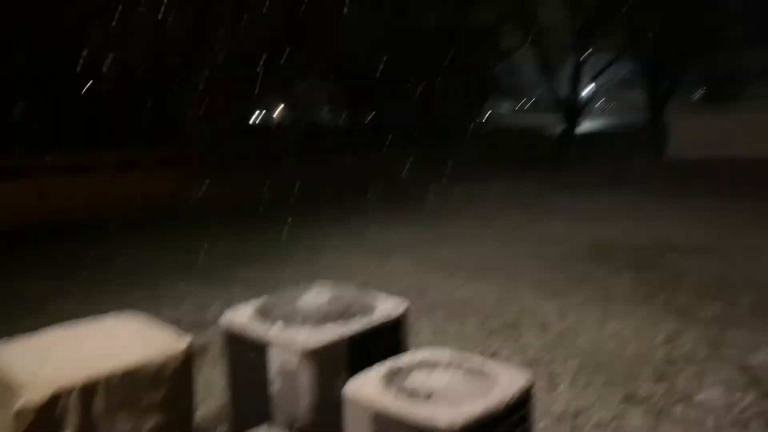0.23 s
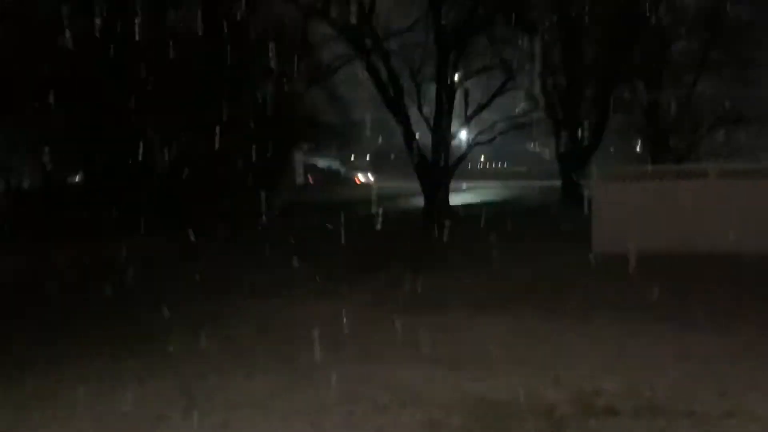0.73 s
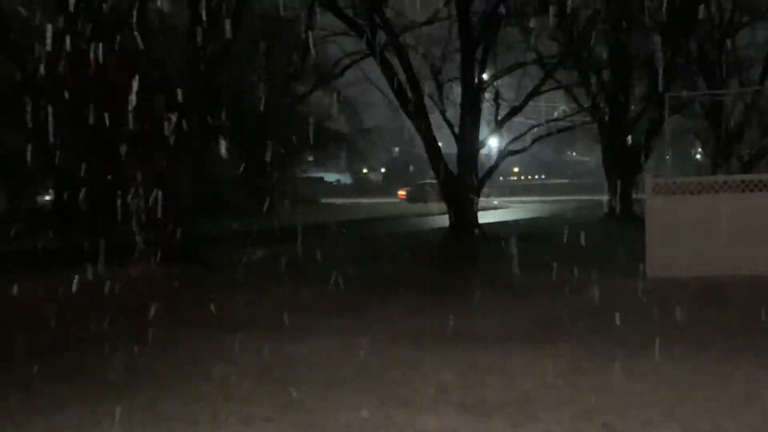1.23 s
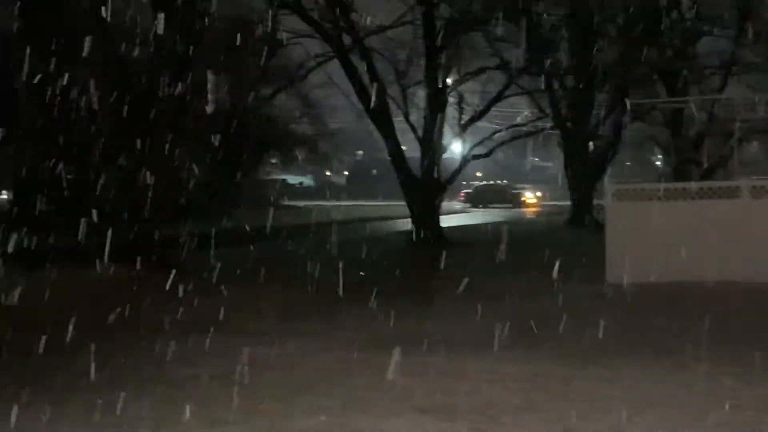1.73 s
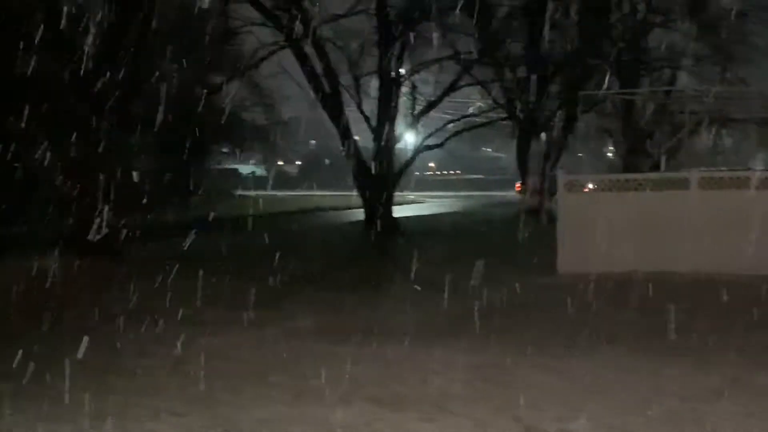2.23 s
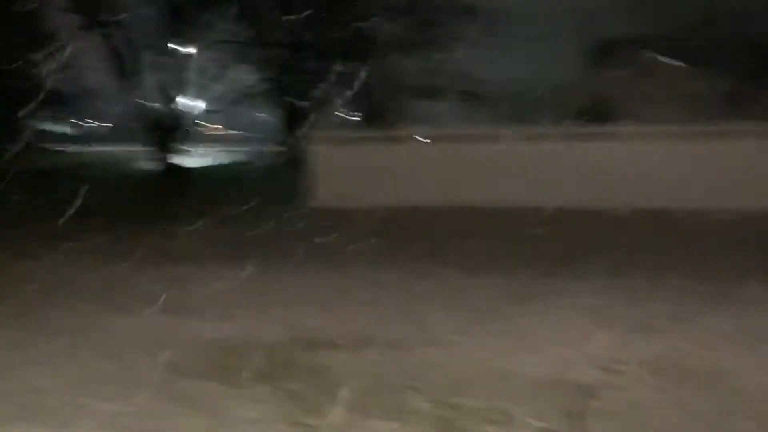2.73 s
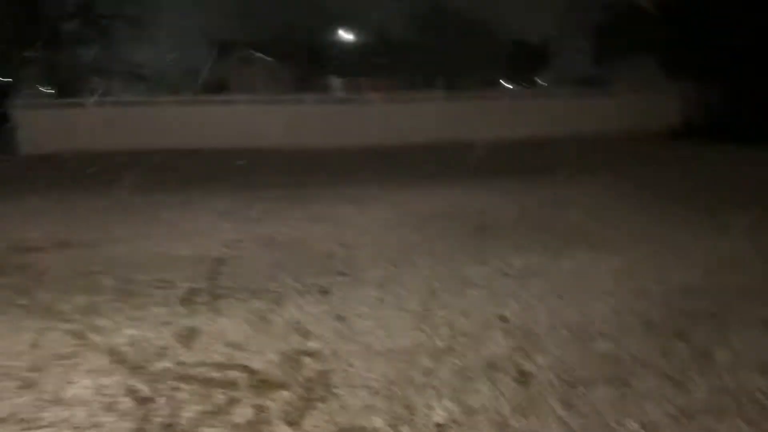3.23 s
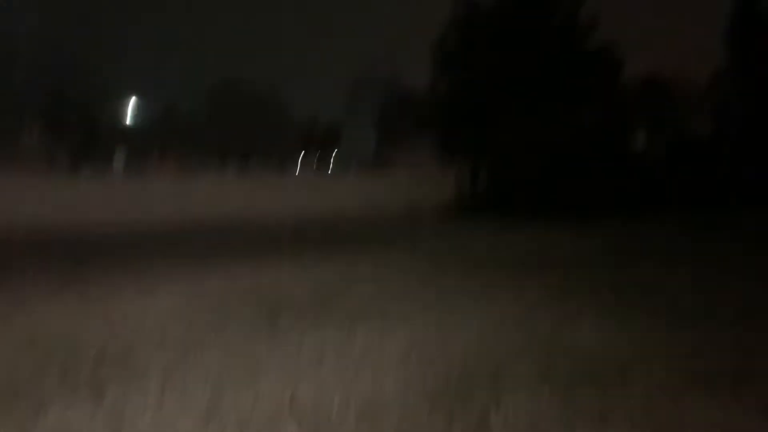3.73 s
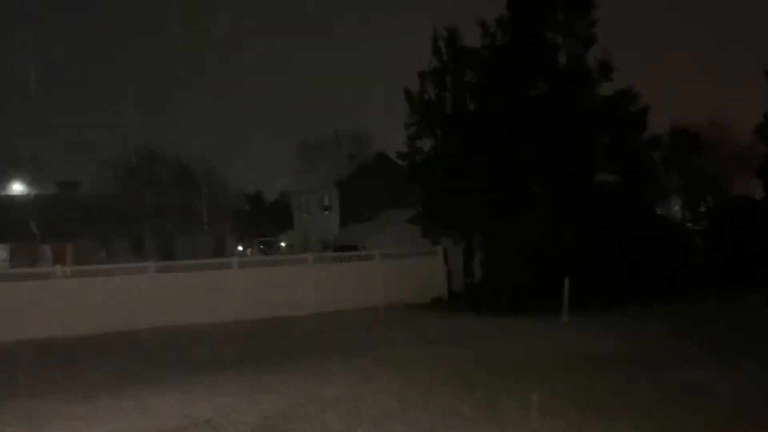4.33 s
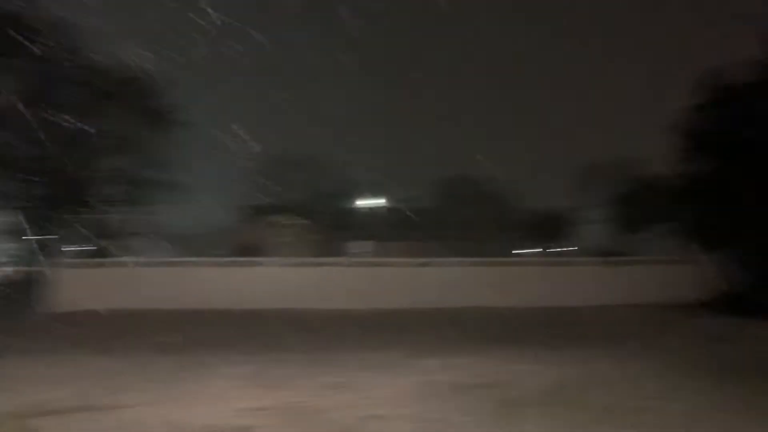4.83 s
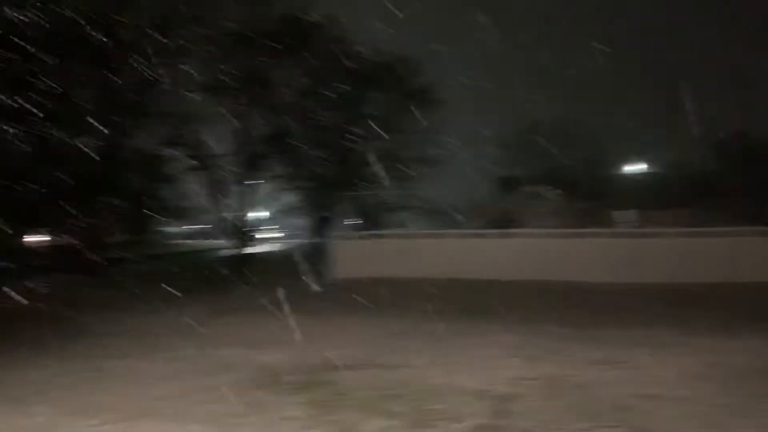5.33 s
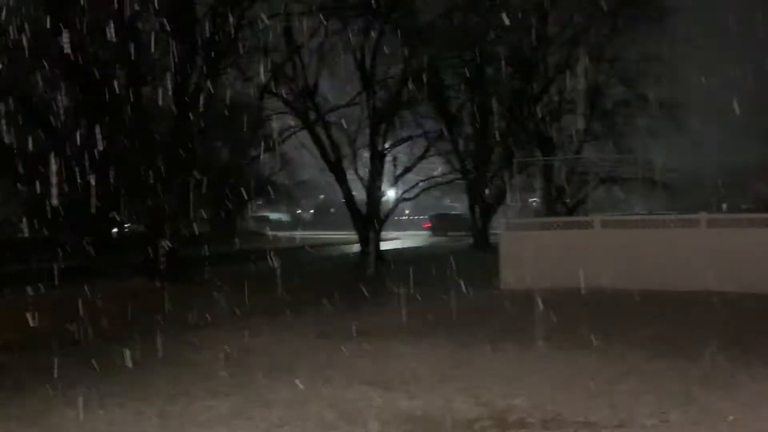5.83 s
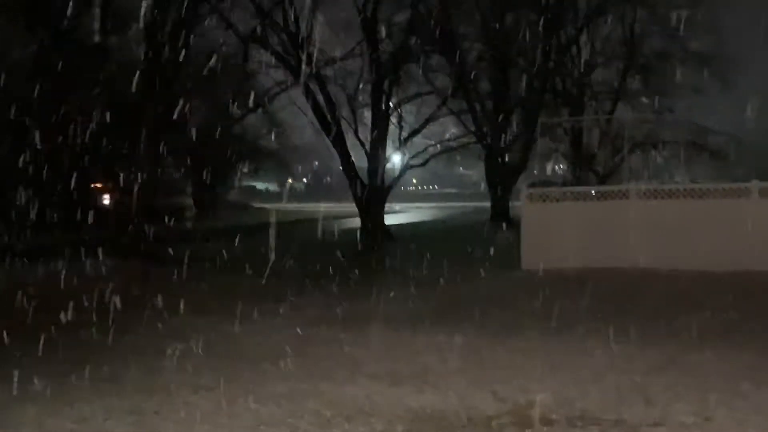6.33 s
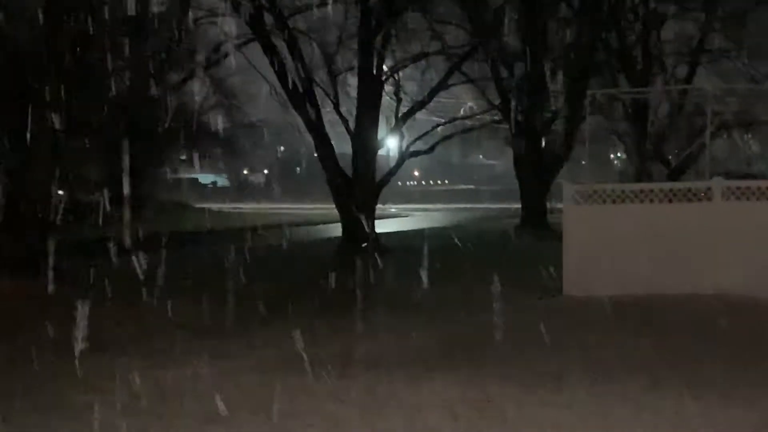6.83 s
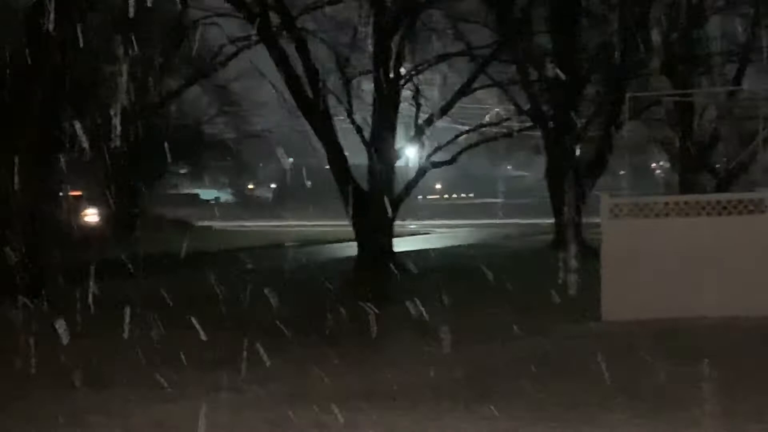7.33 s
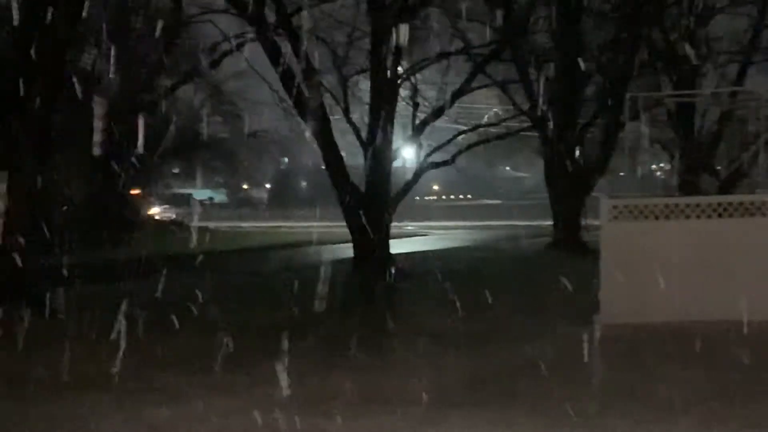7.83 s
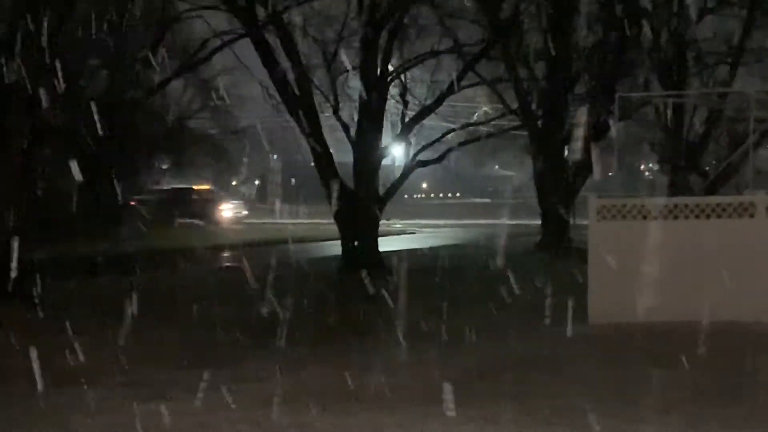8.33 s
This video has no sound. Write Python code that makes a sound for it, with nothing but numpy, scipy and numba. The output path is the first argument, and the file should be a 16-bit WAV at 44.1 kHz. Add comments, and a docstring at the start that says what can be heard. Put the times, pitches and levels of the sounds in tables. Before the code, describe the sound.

Outdoors at night, a quiet low rumble with faint road roar and hiss. A close coat sleeve swishes early, then a truck pulls away on the wet street beyond the lawn, tyres spraying softly. Its uneven engine note climbs, drops at a gear shift and climbs again. Sleet ticks on sheet metal; two dull knocks hit the hand-held phone midway, followed by the strongest cloth swish. More soft rustles come near the end.

```python
"""Wet street beyond a lawn on a sleety night, heard with a hand-held phone: an uneven eight-cylinder truck
pulls away and shifts gear. Its engine is a sum of orders of the engine cycle, its tyre spray is noise in tread
resonances. Town rumble, road roar and hiss are bands of noise; a far hum is one drifting tone. Close by, a coat
sleeve swishes and its seam snaps (filtered noise), sleet ticks on sheet metal (short noise bursts), and the hand
taps and knocks the phone (a soft pulse and short sagging tones)."""
import sys
import numpy as np
from scipy import signal
from scipy.fft import irfft, next_fast_len
from scipy.io import wavfile
from scipy.ndimage import uniform_filter1d
from numba import njit

SR = 44100
rng = np.random.default_rng(int(sys.argv[2]) if len(sys.argv) > 2 else 0)


def to_wav(sig):
    """Store sig (one row per channel, or 1-D mono) as 16-bit WAV at the path in sys.argv[1].

    Samples outside -1..1 are clipped; the rate is SR.
    """
    pcm = np.clip(np.atleast_2d(sig), -1, 1) * 32767
    pcm = np.round(pcm).astype(np.int16)
    wavfile.write(sys.argv[1], SR, pcm.T)  # frames by channels


N = 378819
T = np.arange(N) / SR


def undb(db):
    """Decibels to amplitude."""
    return 10 ** (np.asarray(db) / 20)


def curves(table, fade_s=.03):
    """A gate that opens at the first time and closes after the last, then each column over time."""
    s, *columns = np.transpose(table)
    gate = np.clip(np.minimum(T - s[0], s[-1] + fade_s - T) / fade_s, 0, 1)
    return [gate] + [np.interp(T, s, c) for c in columns]


def over_hz(points, hz):
    """Read a curve of (Hz, value) points along a log frequency axis."""
    f, value = np.transpose(points)
    return np.interp(np.log(hz), np.log(f), value)


@njit
def svf(x, hz, width):
    """State-variable band-pass with a moving centre, gain 1 there."""
    y, b, l = np.empty(len(x)), 0., 0.
    for i in range(len(x)):
        g, k = np.tan(np.pi * hz[i] / SR), width / hz[i]
        v = (b + g * (x[i] - l)) / (1 + g * (g + k))
        b, l, y[i] = 2 * v - b, l + 2 * g * v, k * v
    return y


def twice(x, hz, width):
    """Pass a sound through the same moving resonance twice and bring it to rms 1."""
    return unit(svf(svf(x, hz, width), hz, width))


def band(lo_hz, hi_hz):
    """Noise between two edges; its power follows a raised cosine on a log frequency axis."""
    size = next_fast_len(N)
    f = np.arange(size // 2 + 1) * SR / size
    place = np.log(np.maximum(f, 1) / lo_hz) / np.log(hi_hz / lo_hz)
    used = (place > 0) & (place < 1)
    bins = np.zeros(len(f), complex)
    bins[used] = np.sin(np.pi * place[used]) * (rng.standard_normal((used.sum(), 2)) @ [1, 1j])
    return irfft(bins, size)[:N]


def unit(x):
    """Scale to rms 1."""
    return x / np.sqrt(np.mean(x ** 2))


def walk(rate, size=N):
    """Random levels held 1 / rate s and slewed twice; spread near 1."""
    k = int(SR / rate)
    steps = np.repeat(rng.standard_normal(size // k + 1), k)
    return 1.3 * uniform_filter1d(uniform_filter1d(steps, k), k)[:size]


def ports(x, lag):
    """One sound at two microphone ports, the right one later by lag samples."""
    return np.array([x, np.roll(x, lag)])


def tone(turns, db, waver_db):
    """A partial whose rms level wavers around db on its way through the air."""
    return np.sqrt(2) * undb(db + waver_db * walk(9)) * np.sin(2 * np.pi * (turns + rng.random()))


def ring(events, share, decay_s):
    """Short bursts of noise at (s, peak dB, Hz), each through resonances tied to its pitch by a share."""
    out, t = np.zeros(N + SR), np.arange(SR // 20) / SR
    for (s, db, hz), noise in zip(events, rng.standard_normal((len(events), len(t)))):
        centre = np.full(len(t), 1. * hz)
        narrow = svf(noise * np.exp(-t / decay_s), centre, share * hz)
        burst = svf(narrow, centre, 2. * share * hz)
        out[int(s * SR):][:len(t)] += undb(db) * burst / abs(burst).max()
    return out[:N]


def night():
    """Quarter-octave steps of noise make rumble, roar and hiss; each band flickers a little on its own."""
    # background over time: t/s, rumble change/dB, road roar/dB, hiss/dB (the last two count from their means)
    background = [(0, -1.5, -1.5, 0.5), (1.6, -2.5, -2, 1), (2.5, -0.5, -0.5, 0.5), (3.2, -3, -4, 1),
                  (4.1, -2.5, -4, -0.5), (4.6, 0.5, -3, 0.5), (4.85, 3.5, -0.5, 1), (5.1, -1.5, -1, -0.5),
                  (5.6, -1, 1, 5), (6.6, -1.5, 0.5, 0.5), (8.59, 1, -1.5, 2.5)]
    # spectrum of the night air: f/Hz, relative density/dB per Hz
    air = [(25, -32.5), (52, -2), (110, -2.5), (152, -5.5), (227, -14.5), (330, -26.5), (550, -29.5),
           (945, -26), (1900, -30), (2600, -30), (4800, -39), (6800, -50.5), (8600, -63), (11500, -56.5),
           (13200, -87.5), (15500, -64.5)]
    # resonances of the rumble: f/Hz, width/Hz, level/dB
    drones = [(290.5, 15.5, 7.5), (425.2, 71, 13), (738.7, 74, 14.5)]
    # share common to both ports: f/Hz, share/0-1
    alike = [(60, 1), (250, 0.48), (600, 0.24), (1500, 0.07), (12000, 0.26)]
    # the hand shades the right port: f/Hz, left minus right/dB
    shade = [(170, -0.5), (600, 4.5), (1300, -0.5)]
    opening_db = -40  # rms of the first half second
    _, rumble_db, *upper_db = curves(background)
    changes = np.array([rumble_db] + [db - db.mean() for db in upper_db])
    out = 0
    for hz in 25 * 2 ** np.arange(0, 9.4, 1 / 4):
        # 0 is rumble, 1 roar, 2 hiss; bands between blend two of them
        place = over_hz([(200, 0), (700, 1), (3000, 2)], hz)
        weights = np.clip(1 - abs(place - np.arange(3)), 0, 1)
        lift = sum((undb(db) - 1) / (1 + (2 * (hz - f) / w) ** 2) for f, w, db in drones)
        common, left, right = (band(hz * 2 ** -.25, hz * 2 ** .25) for _ in range(3))
        share = np.clip(over_hz(alike, hz), 0, 1)
        pair = np.sqrt(share) * ports(common, lag=13) + np.sqrt(1 - share) * np.array([left, right])
        pair *= undb(over_hz(shade, hz) * np.array([[.5], [-.5]]))
        level_db = over_hz(air, hz) + weights @ changes + 1.4 * walk(8.8)
        out = out + (1 + lift) * undb(level_db) * pair
    return out * undb(opening_db) / np.sqrt(np.mean(out[:, :SR // 2] ** 2))


def cloth(fold_hz, width_hz, broad_db, sheen_db, rub_db, size):
    """Fibres slip in a dense crackle; a fold of the cloth rings in a moving band."""
    crackle_db = 2.5 * rng.exponential(size=size) * (rng.random(size) < .05)  # one slip in twenty is stronger
    slips = rng.standard_normal(size) * undb(crackle_db + 2.2 * walk(70, size))
    # the body mirrors the rustle 3.7 ms later and ripples its colour
    slips = slips + .55 * np.roll(slips, int(.0037 * SR))
    fold = twice(slips, fold_hz, width_hz)
    broad = twice(slips, np.full(size, 3200.), 6000.)
    rub = twice(slips, np.full(size, 1050.), 3000.)
    dull = signal.butter(4, 6800, fs=SR, output="sos")
    body = signal.sosfilt(dull, fold + undb(broad_db) * broad)
    high = signal.butter(2, (8700, 14500), "band", fs=SR, output="sos")
    sheen = unit(signal.sosfilt(high, slips))
    return body + undb(sheen_db) * sheen + undb(rub_db) * rub


def sleeve():
    """Each swish swells, holds and dies, from its own side; its fold band follows the force of the stroke."""
    # coat sleeve close by: t/s, attack/s, hold/s, release/s, level/dB, fold band f/Hz at start, at hold, at end,
    # fold band width/Hz, broad rustle/dB, high sheen/dB, low rub/dB, right port late by/samples
    swishes = [(0.545, 0.058, 0.004, 0.03, -46.5, 1900, 4600, 4900, 520, -3, -13, -9, 17),
               (.612, .012, .032, .06, -49, 3200, 3700, 2600, 900, -1, -9, -2, 16),
               (.648, .012, .04, .12, -55.5, 2300, 2180, 2100, 350, 1, -9, -4, 16),
               (3.153, .002, .016, .09, -49, 1700, 1850, 1700, 1400, -3, -22, -4, -1),
               (3.562, .04, 0.036, .06, -61.5, 2494, 2300, 2400, 900, -13, -18, 4, -1),
               (3.654, 0.033, 0.025, .045, -44, 1700, 1330, 1200, 1330, -3.5, -14, -13, -1.5),
               (5.553, 0.035, 0.06, 0.16, -48, 5000, 5350, 5900, 650, -12, -31, -8, 6),
               (5.53, 0.13, 0.15, .16, -46, 1900, 2130, 2300, 1500, -10, -25, 2.5, 7),
               (5.55, .155, 0.105, 0.075, -39.5, 3800, 4350, 3700, 2800, -8, -19, -8, 7),
               (7.41, 0.014, .01, .12, -65, 4500, 4100, 2400, 2500, 7, -1, -11, 13.5),
               (7.484, 0.079, 0.13, 0.1, -59.5, 3000, 2600, 2400, 2500, 0.5, -15, -18, 20),
               (7.995, 0.035, 0.08, 0.06, -50, 2800, 2500, 2800, 1600, -3, -20, -4, 16),
               (8.085, 0.055, 0.05, 0.14, -46, 2900, 2700, 2400, 1100, -5, -23, -8, 14.5),
               (8.485, 0.07, 0.05, 0.1, -44.5, 2350, 2450, 2500, 1200, -6, -21, -14, 20)]
    start_db, end_db = -14, -24  # relative to the level of the swish
    fold_power = 2  # the fold band moves as this power of the swish's strength
    out = np.zeros((2, N))
    for (s, attack_s, hold_s, release_s, top_db, from_hz, top_hz, to_hz, width_hz,
         broad_db, sheen_db, rub_db, lag) in swishes:
        times = s + np.cumsum(np.abs([0, attack_s, hold_s, release_s]))
        gate, db = curves(list(zip(times, (start_db, 0, 0, end_db))), fade_s=0.013)
        on = gate > 0
        slack_hz = np.where(T[on] < times[1], from_hz, to_hz)
        hz = slack_hz + (top_hz - slack_hz) * undb(fold_power * db[on])
        near, left, right = (cloth(hz, 1. * width_hz, broad_db, sheen_db, rub_db, on.sum())
                             for _ in range(3))
        pair = .92 * ports(near, round(lag)) + .39 * np.array([left, right])
        out[:, on] += gate[on] * undb(top_db + db[on]) * pair
    return out


def seam():
    """A stiff seam snaps close in front: noise bursts die in milliseconds through a wide resonance."""
    # snaps: t/s, peak level/dB, f/Hz
    snaps = [(.62, -36.5, 600), (3.02, -44, 6260), (3.156, -42, 1800), (5.766, -27, 480),
             (5.796, -32, 2980), (7.672, -35.5, 2360)]
    return ports(ring(snaps, share=.9, decay_s=.004), lag=4)


def sleet():
    """Sleet ticks on sheet metal off to the side: each short burst excites three modes of the metal."""
    # ticks: t/s, level/dB ahead of the mode levels
    ticks = [(0.782, -43), (1.08, -43.5), (1.6307, -44.5), (1.825, -40.5), (2.2673, -44), (4.7468, -42.5),
             (5.079, -41.5), (6.695, -48.5), (7.9416, -46)]
    # modes of the metal: f/Hz, width/share of f, level/dB
    modes = [(4500, .25, -2), (2450, .3, -5), (6300, .5, -15)]
    spread, decay_s = .06, .011  # share by which the pitch of a mode varies, decay of the burst
    out = 0
    for hz, share, mode_db in modes:
        events = [(s, db + mode_db, hz * (1 + spread * rng.standard_normal())) for s, db in ticks]
        out = out + ring(events, share, decay_s)
    return ports(out, lag=17)


def tyres():
    """Spray from straight ahead, coloured by the tread; houses scatter part of it to each side."""
    # tyres on the wet corner: t/s, level/dB, tread pitch/share of its mean, lowest tread band/dB
    spray = [(1.5, -70, .97, 6), (1.68, -58, 0.99, 7), (1.92, -53, 0.98, 5), (2.2, -54, 1.04, 6),
             (2.3, -55, 1.01, 0), (2.65, -57.5, 0.96, 1.5), (2.9, -66, 0.9, 2)]
    # tread resonances: f/Hz, width/Hz, level/dB
    tread = [(1450, 520, 0), (2500, 400, -3), (3230, 250, -4), (3900, 300, -8), (4500, 6000, -5)]
    gate, db, share, low_db = curves(spray, fade_s=0.045)

    def coloured():
        """One independent stream of spray through all the tread resonances."""
        out = 0
        for k, (hz, width_hz, tread_db) in enumerate(tread):
            level_db = tread_db + low_db * (k == 0) + 2.0 * walk(9)
            out = out + undb(level_db) * twice(rng.standard_normal(N), hz * share, 1. * width_hz)
        return out / 2

    ahead, left, right = (coloured() for _ in range(3))
    near = 0.85 * ports(ahead, lag=1) + np.array([left, right])
    # the spray is dulled above 6.8 kHz
    far = signal.sosfilt(signal.butter(4, 6800, fs=SR, output="sos"), near)
    return gate * undb(db + walk(10.12)) * far


def truck():
    """Orders of the engine cycle: eight firings a cycle, the uneven banks fill in the others."""
    # engine speed: t/s, four-stroke cycle rate f/Hz
    cycle = [(1.55, 7.2), (1.75, 8.2), (2.1, 10.9), (2.25, 11.8), (2.6, 12.25), (3.0, 12.4), (3.3, 12.1),
             (3.6, 12.4), (5.1, 14.75), (5.98, 16.95), (6.5, 15.65), (6.75, 15.5), (7.5, 17.15),
             (7.8, 17.65), (8.59, 18.65)]
    # engine as heard from the lawn: t/s, firing tone level/dB, exhaust bark level/dB
    heard = [(1.55, -58, -64), (1.75, -36.5, -69), (2.35, -40.5, -49.5), (2.62, -35.5, -53),
             (2.9, -41, -50), (3.75, -44, -54), (4.3, -39.5, -58.5), (4.9, -43.5, -54.5), (5.3, -35, -45.5),
             (5.6, -38.5, -43), (5.95, -44, -43.5), (6.45, -33, -42), (6.95, -33.5, -43),
             (7.4, -40.5, -44.5), (7.85, -46.5, -47.5), (8.2, -38, -47.5), (8.59, -39.5, -50)]
    # other orders in the bark: order/cycles, level/dB pulling away, level/dB behind the fence,
    # level/dB once the tailpipe has swung round (all relative to the bark)
    bark = [(3, -11, -6.5, 10), (5, 9.5, 4, 3.5), (10, -15, -13, 2.5), (11, 2.5, -16, 9.5), (13, -9, -2, 0),
            (14, -10, -8.5, 0), (15, -7, -15.5, -8.5), (16, 0, -4.5, -24), (17, -6, -17.5, -6.5),
            (19, -17, -8.5, -14), (21, -17, -14.5, -31)]
    swing_s, swing_span_s = (5.03, 7.45), 0.62  # middle of each change of level, and how long it takes
    gate, firing_db, bark_db = curves(heard, fade_s=0.32)
    turns = np.cumsum(curves(cycle)[1] * (1 + 0.0016 * walk(12))) / SR
    out = tone(8 * turns, firing_db, 1.53)
    hidden, swung = (np.clip((T - s) / swing_span_s + .5, 0, 1) for s in swing_s)
    for order, away_db, hidden_db, round_db in bark:
        order_db = away_db + hidden * (hidden_db - away_db) + swung * (round_db - hidden_db)
        out += tone(order * turns, bark_db + order_db + 1.9 * walk(2.5), 1.2)
    return ports(gate * out, lag=10)


def hum():
    """A slowly drifting tone from far off."""
    # hum: t/s, f/Hz, level/dB
    drift = [(2.25, 137, -45), (3.15, 140.9, -49), (3.5, 144, -57)]
    gate, hz, db = curves(drift, fade_s=0.24)
    return ports(gate * tone(np.cumsum(hz) / SR, db, 2), lag=10)


def tap():
    """A fingertip's soft push on the case: one smooth pulse of pressure."""
    start_s, db, push_s = 2.7088, -26, .0028
    out = np.zeros(N)
    push = np.hanning(int(push_s * SR))
    out[int(start_s * SR):][:len(push)] += undb(db) * push
    return ports(out, lag=4)


def knocks():
    """The hand knocks the phone: a short swelling tone sags in pitch as the grip settles."""
    # knocks: t/s, peak level/dB, start f/Hz, end f/Hz
    blows = [(4.915, -24.5, 430, 75), (4.971, -21, 450, 75)]
    out, t = np.zeros(N + SR), np.arange(SR // 20) / SR
    for s, db, hi_hz, lo_hz in blows:
        hz = lo_hz + (hi_hz - lo_hz) * np.exp(-t / .006)
        peak_s = .8 / lo_hz  # a deeper knock swells and lasts longer
        swell = (t / peak_s * np.exp(1 - t / peak_s)) ** 3
        out[int(s * SR):][:len(t)] += undb(db) * swell * np.sin(2 * np.pi * np.cumsum(hz) / SR)
    return ports(out[:N], lag=4)


def scene():
    """All sources together at the two microphone ports."""
    return night() + sleeve() + seam() + sleet() + tyres() + truck() + hum() + tap() + knocks()


def record(dry):
    """The phone cuts the top above 15.8 kHz."""
    return signal.sosfilt(signal.ellip(8, .2, 70, 15800, fs=SR, output="sos"), dry)


dry = scene()
out = record(dry)
to_wav(out)
```